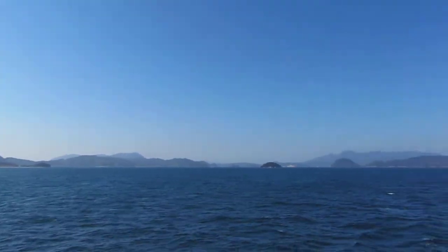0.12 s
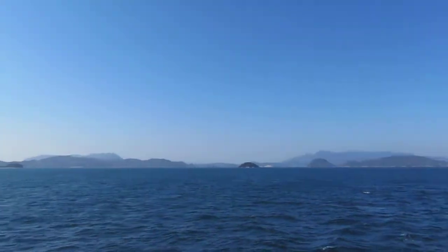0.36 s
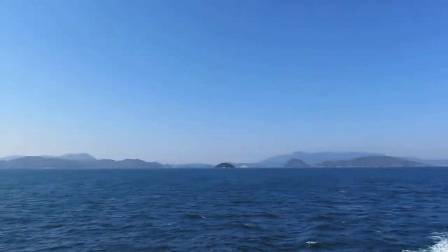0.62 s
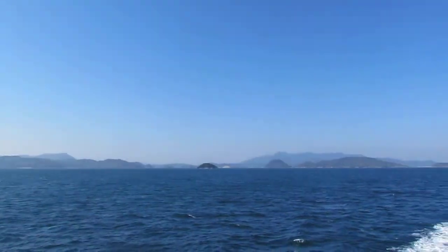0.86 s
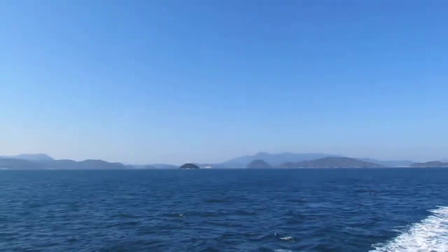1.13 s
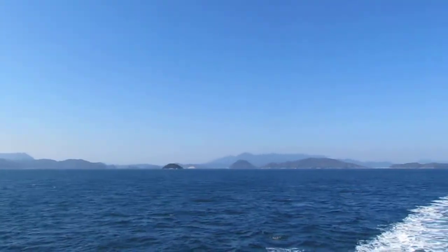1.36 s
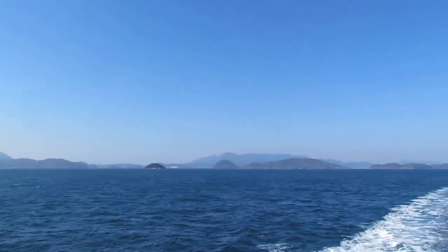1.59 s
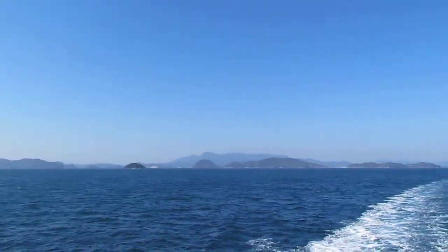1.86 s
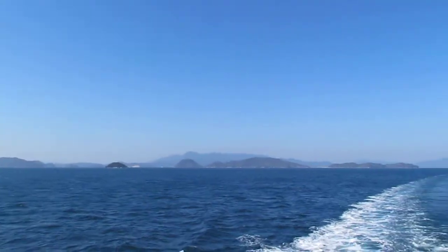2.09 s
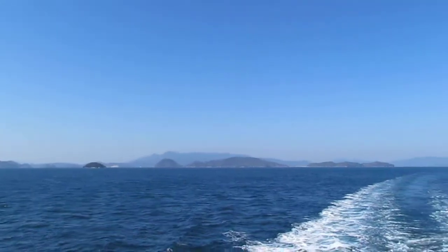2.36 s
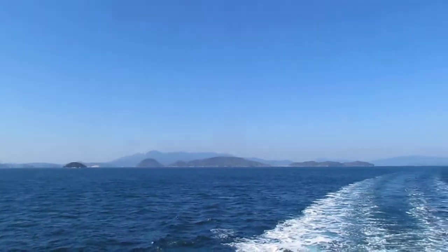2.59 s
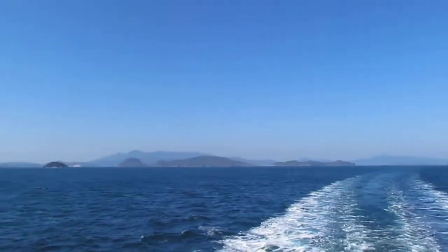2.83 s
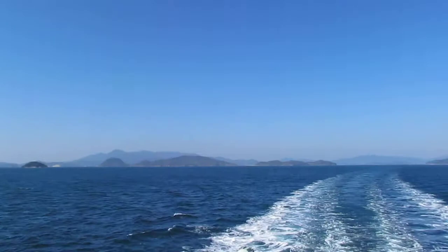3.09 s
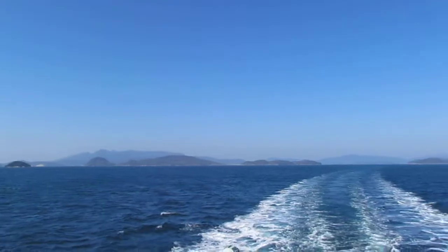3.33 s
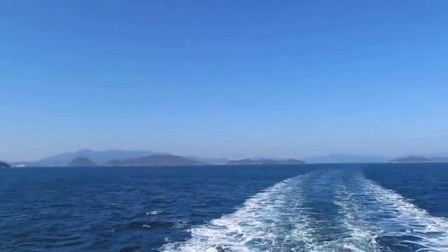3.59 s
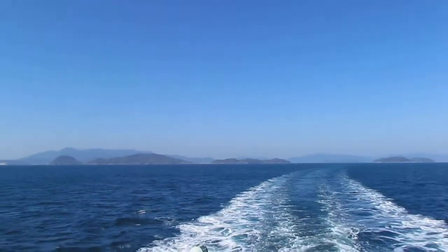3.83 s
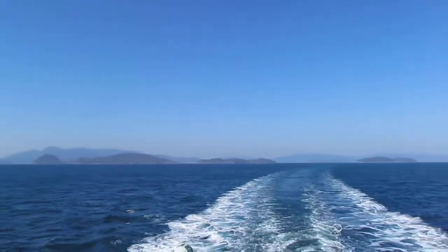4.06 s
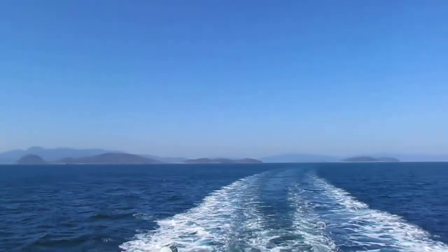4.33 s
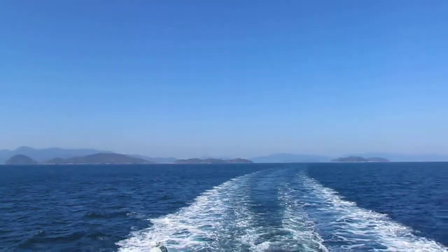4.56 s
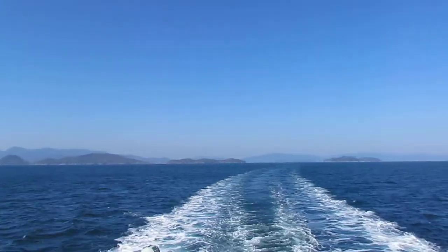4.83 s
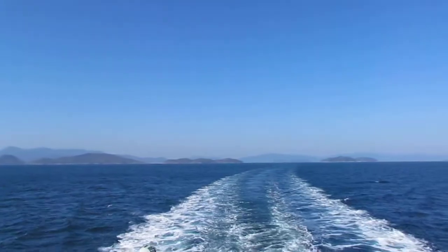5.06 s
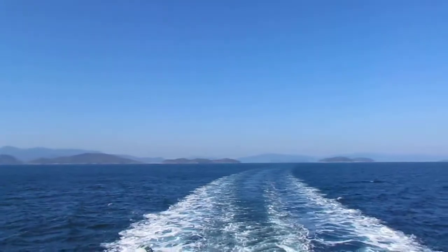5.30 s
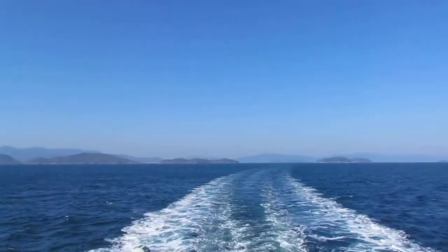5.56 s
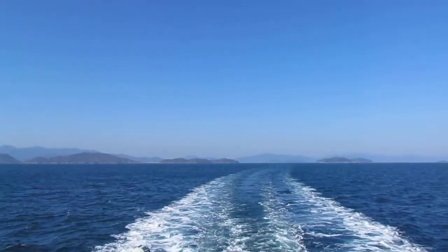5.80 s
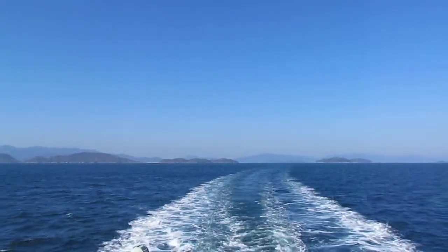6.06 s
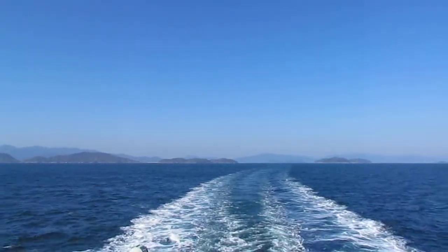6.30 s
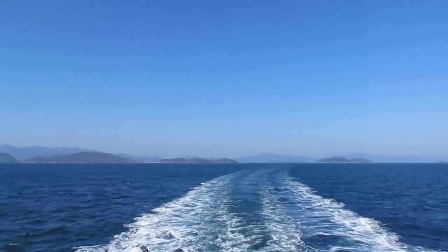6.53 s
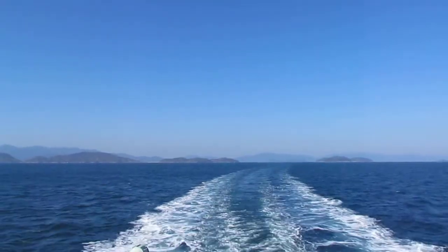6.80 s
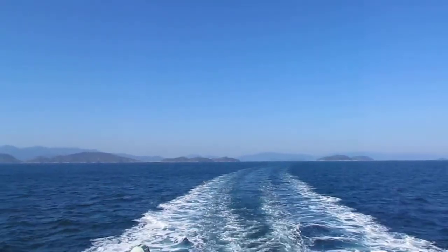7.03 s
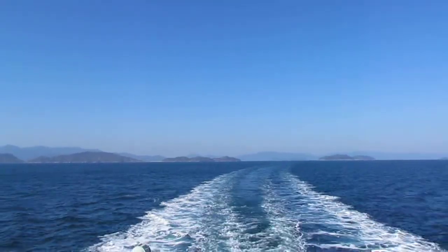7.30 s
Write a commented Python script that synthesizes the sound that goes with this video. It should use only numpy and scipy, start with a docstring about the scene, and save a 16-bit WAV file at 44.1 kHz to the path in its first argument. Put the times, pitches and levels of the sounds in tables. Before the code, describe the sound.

Outdoors at the stern of a ferry under way, a constant low diesel drone fills the background, two engines nearly in step so the throb slowly swells and thins. Generator and fan hum and a faint, slightly wandering midrange whine sit within it. Over this lies the broad roar of churned water and a soft, fluttering foam hiss, a little fuller from about 4 to 5.3 seconds, with small spray splashes near 4.4, 4.8 and 5.2. Wind buffets the close stereo microphone, chiefly on the right: light puffs in the first 2 seconds, stronger thumps from 2.6 to 4, a calmer spell, then hard gusts from 5.6, with the sharpest rasping slaps around 6.05, 6.35 and 6.55. Loud gusts slightly overload and press down the whole sound, which recovers only slowly. Lesser gusts follow around 7 as engine and wake continue to the end at 7.4 seconds.

```python
"""Stern deck of a ferry: two slow diesels turn almost in step, so their orders beat against each other.
Orders and machine tones are sums of cosines, steady or wandering; a gear whine drifts in pitch.
Roar, wake hiss and brief splashes are shaped noise; noise gusts and slaps buffet the right microphone port.
Gain control ducks everything on loud moments, recovers slowly and feeds a soft overload."""
import sys
import numpy as np
from scipy import signal
from scipy.fft import rfft, irfft
from scipy.io import wavfile
from scipy.ndimage import uniform_filter1d

SR = 44100
rng = np.random.default_rng(int(sys.argv[2]) if len(sys.argv) > 2 else 0)


def how_loud(loudness_db):
    """Turn decibels into a plain amplitude multiplier (0 dB gives 1, 20 dB gives 10)."""
    steps = np.asarray(loudness_db, float) / 20
    return 10 ** steps


def bounce(signal):
    """Save signal as a 16-bit WAV file at the path given by the first command-line argument."""
    frames = np.transpose(np.atleast_2d(signal))
    limited = np.clip(frames, -1, 1)
    pcm = np.round(limited * 32767).astype(np.int16)
    wavfile.write(sys.argv[1], SR, pcm)


N = 326781

# Levels hold ahead of the gain control.
# Orders of the four-stroke cycle, before port gain: multiple, slower engine level/dB, faster engine level/dB
ENGINE_ORDERS = [(5, -56, -51), (6, -45, -39), (7, -69, -54), (8, -54, -44), (9, -50, -44), (10, -51, -44),
                 (11, -47, -47), (12, -37, -41), (13, -33, -35), (14, -46, -54), (15, -52, -45),
                 (16, -37, -41), (17, -43, -42), (18, -39, -30), (19, -43, -26), (20, -29, -32),
                 (21, -36, -33), (22, -29, -31), (23, -39, -59), (24, -41, -41), (25, -24, -28),
                 (26, -46, -37), (27, -52, -41), (28, -41, -39), (29, -49, -47), (30, -49, -38),
                 (31, -34, -38), (32, -55, -48), (33, -47, -46), (34, -47, -49), (35, -38, -62),
                 (36, -46, -41), (37, -45, -42), (38, -50, -72), (39, -59, -42), (40, -42, -41),
                 (41, -61, -52), (42, -51, -45), (43, -46, -57), (44, -55, -50), (45, -50, -46),
                 (46, -54, -42), (47, -45, -50), (48, -45, -48), (49, -38, -44), (50, -43, -52)]
# Two engines: cycle rate f/Hz, starting place in the cycle/turns
ENGINE_CYCLES = [(4.8596, .682), (4.8836, .704)]
# Level change of the deepest orders: t/s, level/dB
DEEP_ORDER_LEVEL = [(0, 0.5), (2.4, 10), (4.3, -6), (7.41, 0)]
# Tones of the auxiliary machines, before port gain: f/Hz, level/dB, width/Hz
MACHINE_TONES = [(59.66, -30, 0.16), (206.9, -34.5, 0.8), (236.7, -36, 9.3), (275, -35, 2.7),
                 (308, -42, 3.3), (315, -41.5, 0.77), (560, -39.5, 36), (590, -44.5, 18), (833.6, -42, 31),
                 (1254, -46.5, 45), (1490, -58.5, 34), (1606, -50.5, 45), (1791, -43, 77), (1830, -67, 8.4)]
# Gear whine, before port gain: t/s, level/dB
WHINE_LEVEL = [(0, -38), (1, -39.5), (4.4, -37), (5.3, -42.5), (6.4, -35.5), (7.0, -40.5), (7.41, -41)]
# Mean roar of exhaust and churned water: f/Hz, density/(dB per Hz)
ROAR_DENSITY = [(20, -63), (60, -64), (110, -53.5), (240, -53.5), (280, -55.5), (600, -59), (950, -61),
                (1150, -65.5), (1400, -73), (1800, -72.5), (2500, -76), (4000, -83.5), (8000, -115)]
# Wake foam at 0 dB: f/Hz, density/(dB per Hz)
FOAM_DENSITY = [(300, -27.5), (1000, -26.5), (2000, -30), (3500, -40), (5500, -38.5), (10500, -43.5),
                (12500, -47.5), (14000, -67), (15500, -76)]
# Foam as crests break, before flutter: t/s, level/dB
FOAM_LEVEL = [(0, -47.5), (.45, -47), (1.3, -48), (1.85, -46.5), (2.05, -47.5), (2.9, -48), (3.6, -47),
              (4.2, -45), (4.4, -44), (4.75, -44), (4.95, -44), (5.15, -43.5), (5.35, -46), (6.1, -46),
              (6.33, -44), (6.64, -49), (7.1, -46), (7.41, -48)]
# Diffuse noise at the two ports: f/Hz, likeness (0-1), left phase lead/rad, left minus right level/dB
PORT_PAIR = [(60, .99, 0, -1), (300, .96, 0, -1.2), (900, .78, .1, -1.2), (1500, .58, .2, -1.1),
             (2500, .38, .16, -1.3), (4000, .27, 0, -.1), (6000, .25, -.9, -.8), (8000, .33, -2.4, -1.4),
             (10500, .33, -2.5, -.8), (13500, .2, -1.9, .7)]
# Gusts, as wind strength: start t/s, hold/s, level/dB
WIND_GUSTS = [(.04, 0.052, -23.5), (.31, 0.026, -27), (.76, 0.09, -43), (1.41, 0.098, -20.5),
              (1.8, 0.22, -29.5), (1.969, 0.19, -20), (2.35, 0.035, -19.5), (2.42, .36, -24.5),
              (2.61, .04, -15), (2.965, 0.011, -10.5), (3.061, 0.043, -12), (3.13, 0.24, -18),
              (3.6, .05, -19), (3.7, .13, -14.5), (3.755, 0.036, -13), (3.86, .14, -21.5),
              (4.26, 0.093, -18.5), (4.83, 0.12, -23), (5.3, 0.034, -25), (5.43, 0.084, -27.5),
              (5.61, 0.064, -15.5), (5.72, 0.16, -14), (5.88, .1, -18), (6.0, .03, -14),
              (6.05, 0.021, -9.5), (6.27, .06, -14.5), (6.332, 0.052, -10), (6.43, 0.037, -15.5),
              (6.523, 0.034, -7.5), (6.6, .16, -19), (6.9, 0.043, -15), (7.03, 0.066, -15),
              (7.22, 0.035, -26)]
# Low thump of eddies at 0 dB wind: f/Hz, density/(dB per Hz)
THUMP_DENSITY = [(15, -48), (45, -24.5), (100, -20.5), (200, -21.5), (400, -33.5), (700, -46.5),
                 (1500, -61), (4000, -105)]
# Rasp of eddies at 0 dB wind: f/Hz, density/(dB per Hz)
RASP_DENSITY = [(200, -32), (500, -34.5), (1000, -42.5), (2500, -55.5), (4000, -67), (8000, -85),
                (15000, -105)]
# Sharp slaps of air on the right port: peak t/s, level/dB
AIR_SLAPS = [(2.97, -30), (3.08, -18), (6.035, -11), (6.06, -18), (6.35, -4), (6.374, -5.5), (6.53, -4),
             (6.542, -7), (6.556, -10)]
# Crests slapping close under the stern: peak t/s, level/dB
CREST_SPLASHES = [(4.36, -48), (4.8, -39.5), (5.17, -46)]
# Spray at 0 dB: f/Hz, density/(dB per Hz)
SPRAY_DENSITY = [(800, -55), (1800, -38), (2500, -30.5), (4500, -37), (9000, -45), (13000, -56),
                 (15500, -80)]


def evened(x):
    """Scales to rms 1."""
    return x / np.sqrt(np.mean(x ** 2) + 1e-20)


def curve(rows, index=1):
    """One column of a time table at every sample."""
    table = np.array(rows)
    return np.interp(np.arange(N) / SR, table[:, 0], table[:, index])


def read(rows, hz, index=1):
    """One column of a spectrum, interpolated in log frequency."""
    table = np.array(rows)
    return np.interp(np.log(hz + 1), np.log(table[:, 0] + 1), table[:, index])


def drift(corner_hz):
    """Slow random curve of rms 1: noise that weakens above corner_hz."""
    z = rfft(rng.standard_normal(N))
    hz = np.arange(len(z)) * SR / N
    return evened(irfft(z / (1 + (hz / corner_hz) ** 2), N))


def noise_pair(density, patchy_db, size=1024):
    """Diffuse noise, partly alike at the two ports, with smooth patches in time and pitch."""
    frames = 4 * N // size + 5
    hz = np.fft.rfftfreq(size, 1 / SR)
    a, b, c, d, patches = rng.standard_normal((frames, len(hz), 5)).T
    patches = uniform_filter1d(patches, size=14, axis=0)  # across pitch
    patches = evened(uniform_filter1d(patches, size=10, axis=1))  # across time
    likeness, lead_rad, balance_db = (read(PORT_PAIR, hz, index=k)[:, None] for k in (1, 2, 3))
    likeness = np.clip(likeness, -1, 1)
    right = a + 1j * b
    left = likeness * right + np.sqrt(1 - likeness ** 2) * (c + 1j * d)
    left = left * np.exp(1j * lead_rad)
    z = np.array([left * how_loud(balance_db / 2), right / how_loud(balance_db / 2)])
    z *= how_loud(read(density, hz)[:, None] + patchy_db * patches)
    z *= np.sqrt(1.5 * SR / size)  # density to STFT scale
    return signal.istft(z, nperseg=size, noverlap=3 * size // 4)[1][:, :N]


def coloured(density):
    """One channel of steady noise with the given density."""
    hz = np.fft.rfftfreq(N, 1 / SR)
    white = rfft(rng.standard_normal(N))
    return irfft(white * how_loud(read(density, hz)) * np.sqrt(SR / 2), N)


def narrow(turns, width_hz, loose):
    """Tone of rms 1; loose sets how far size and phase wander, width_hz how fast."""
    r = np.exp(-np.pi * width_hz / SR)
    noise = rng.standard_normal((N, 2)) @ [1, 1j]
    wander = 1 + loose * signal.lfilter([np.sqrt((1 - r * r) / 2)], [1, -r], noise)
    return evened((wander * np.exp(2j * np.pi * turns)).real)


def engines():
    """Each engine is a sum of cycle orders; like funnels delay an order alike in both."""
    smear_rad, waver_db, step = 1.72, 2.2, 20  # step in samples
    t = np.arange(0, N + step, step) / SR
    deep_db = np.interp(t, *np.transpose(DEEP_ORDER_LEVEL))
    funnel_rad = smear_rad * rng.standard_normal(len(ENGINE_ORDERS))
    out = 0
    for which, (cycle_hz, start_turns) in enumerate(ENGINE_CYCLES):
        for (order, *db), late_rad in zip(ENGINE_ORDERS, funnel_rad):
            # moving air bends the path
            waver = np.sin(2 * np.pi * (rng.uniform(0.084, 0.512) * t + rng.random()))
            level_db = db[which] + waver_db * waver + deep_db * (order < 8)
            phase = 2 * np.pi * order * (cycle_hz * t + start_turns) + late_rad
            out += how_loud(level_db) * np.sqrt(2) * np.cos(phase)
    return signal.resample_poly(out, up=step, down=1)[:N]


def machines():
    """Generator, fan and pump tones: the narrower, the steadier; the lower, the more alike at both ports."""
    t = np.arange(N) / SR
    out = 0
    for hz, db, width_hz in MACHINE_TONES:
        loose = min(.5 * width_hz, 2.5)
        near = narrow(hz * t + rng.random(), width_hz, loose)
        scattered = narrow(hz * t + rng.random(), width_hz, loose)
        share = min(hz / 2500, .9)  # of the right port's sound that comes off the deck and rails
        right = np.sqrt(1 - share ** 2) * near + share * scattered
        out += how_loud(db) * np.array([near, right])
    return out


def whine():
    """Meshing gear teeth: a narrow tone of drifting pitch, later and louder at the right port."""
    pitch_hz, wander_hz, late_samples, right_db = 972, 1.5, 6, 1.5
    hz = pitch_hz + wander_hz * drift(0.803)
    tone = how_loud(curve(WHINE_LEVEL)) * narrow(np.cumsum(hz) / SR, width_hz=11.0, loose=1.0)
    return np.array([tone, how_loud(right_db) * np.roll(tone, late_samples)])


def wake():
    """Foam hiss follows the breaking crests with a shared flutter; the roar follows them less."""
    level_db = curve(FOAM_LEVEL)
    flutter_db = 0.42 * drift(3.9)
    foam = noise_pair(FOAM_DENSITY, patchy_db=0.8, size=512) * how_loud(level_db + flutter_db)
    roar_swing_db = 0.57 * (level_db - level_db.mean())
    roar = noise_pair(ROAR_DENSITY, patchy_db=0.45, size=2048) * how_loud(roar_swing_db)
    return foam + roar


def wind_db():
    """Wind strength: a restless breeze, and gusts that strike, hold and die away."""
    rise_db_per_s, fall_db_per_s = 500, 400
    breeze_db, breeze_lumps_db = -38, 5
    t = np.arange(0, N / SR + .001, .001)
    gust_power = 0
    for start_s, hold_s, db in WIND_GUSTS:
        rise_db = rise_db_per_s * np.maximum(start_s - t, 0)
        fall_db = fall_db_per_s * np.maximum(t - start_s - hold_s, 0)
        gust_power = gust_power + how_loud(db - rise_db - fall_db) ** 2
    breeze_power = how_loud(breeze_db + breeze_lumps_db * drift(5.6)) ** 2
    return 10 * np.log10(breeze_power + np.interp(np.arange(N) / SR, t, gust_power))


def wind():
    """Lumpy eddies at the ports; the rasp grows faster than the thump as the gust hardens."""
    slap_s = .002  # from the peak to 1/e
    t = np.arange(N) / SR
    gust_db = wind_db()
    thump = coloured(THUMP_DENSITY) * how_loud(gust_db + 2.7 * drift(26))
    rasp = coloured(RASP_DENSITY) * how_loud(1.68 * gust_db + 4.8 * drift(136))
    slap_size = sum(how_loud(db) * np.exp(-((t - peak_s) / slap_s) ** 2) for peak_s, db in AIR_SLAPS)
    right = thump + rasp + slap_size * evened(coloured(RASP_DENSITY))
    lee_thump = how_loud(-15.5) * coloured(THUMP_DENSITY) * how_loud(0.87 * gust_db + 2.7 * drift(15))
    left = lee_thump + how_loud(-21) * right
    return np.array([left, right])


def splashes():
    """Bursts of spray noise that swell and die away exponentially."""
    rise_s, fall_s = 0.033, .05  # time constants
    t = np.arange(N) / SR
    size = 0
    for peak_s, db in CREST_SPLASHES:
        size = size + how_loud(db) * np.exp(-np.maximum((peak_s - t) / rise_s, (t - peak_s) / fall_s))
    return noise_pair(SPRAY_DENSITY, patchy_db=1.0, size=256) * size


def scene():
    """Ship, wake and wind; the right port is a little more sensitive to diesels and machines."""
    diesels = engines() * how_loud(np.array([[1.6], [2.7]]))
    auxiliaries = machines() * how_loud(np.array([[-.6], [.6]]))
    return diesels + auxiliaries + whine() + wake() + splashes() + wind()


def top_cut(x):
    """Nothing passes above the cut-off."""
    return signal.sosfilt(signal.butter(12, 15400, fs=SR, output="sos"), x)


def record(dry):
    """Shared gain falls on loud moments of either port and recovers slowly; then soft overload."""
    threshold_db, gain_db, duck_ratio = -16, 2.5, 0.82
    detector_fall_db_per_s = 4.26
    louder_port = (dry ** 2).max(0)
    power_db = 10 * np.log10(abs(uniform_filter1d(louder_port, size=3500)) + 1e-12)
    fall_db = np.arange(N) * detector_fall_db_per_s / SR
    held_db = np.maximum.accumulate(power_db + fall_db) - fall_db  # peaks, released slowly
    over_db = np.maximum(held_db - threshold_db, 0)
    ducked = dry * how_loud(gain_db - duck_ratio * uniform_filter1d(over_db, size=2500))
    mix = np.tanh(ducked * 1.067) / 1.017
    return top_cut(mix)


dry = scene()
out = record(dry)
bounce(out)
```